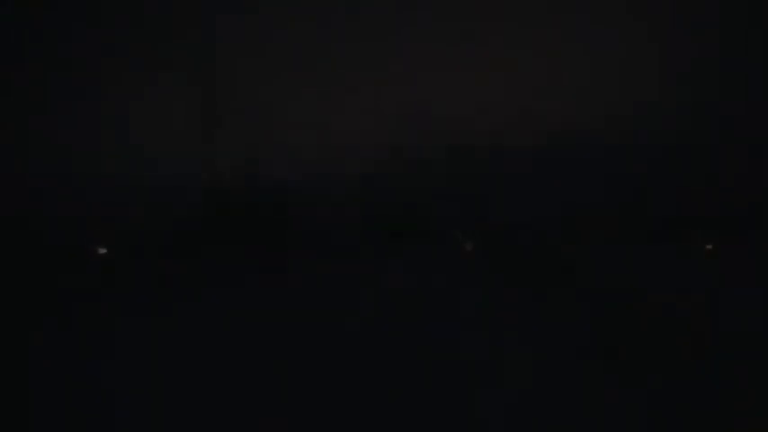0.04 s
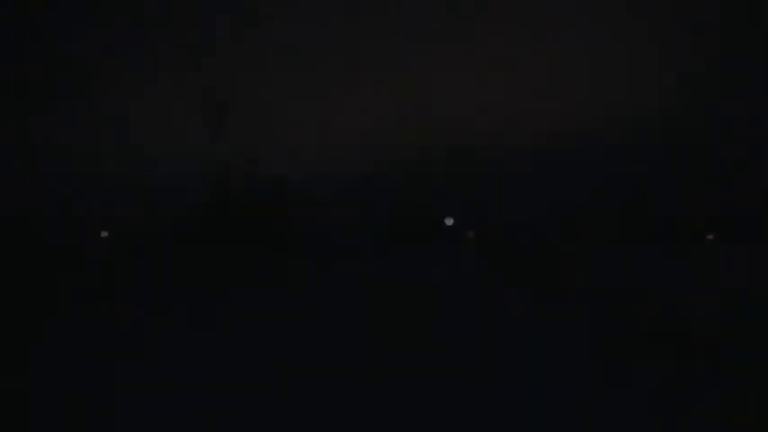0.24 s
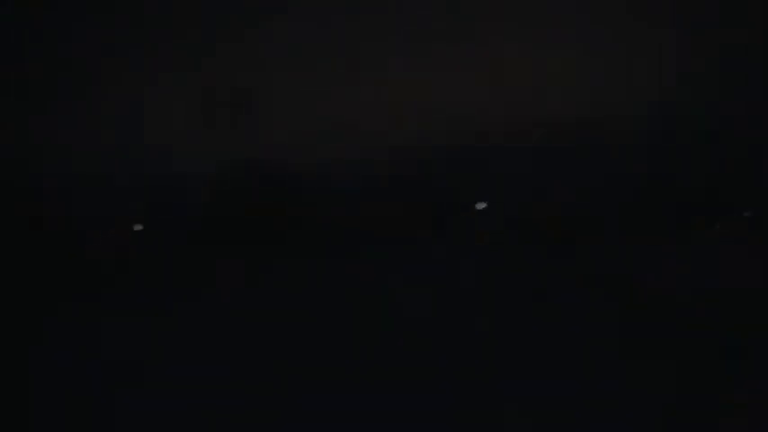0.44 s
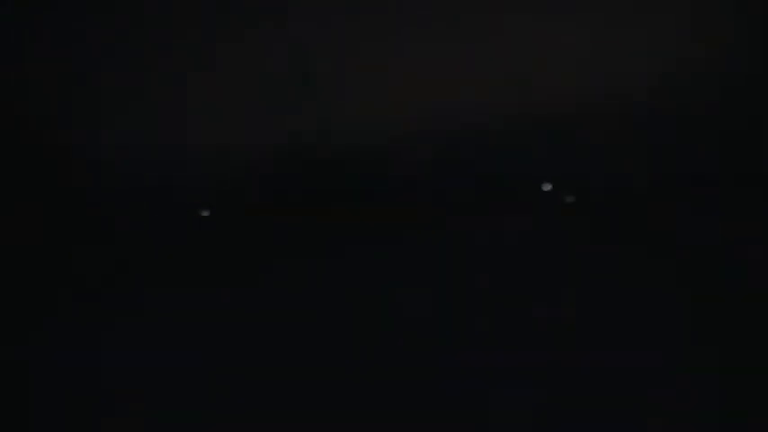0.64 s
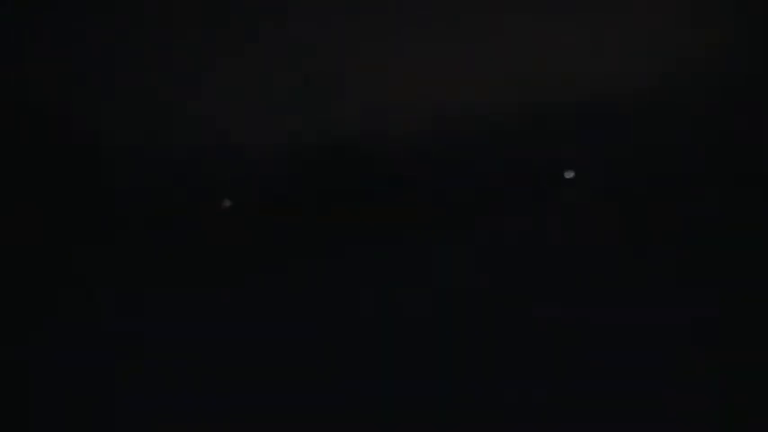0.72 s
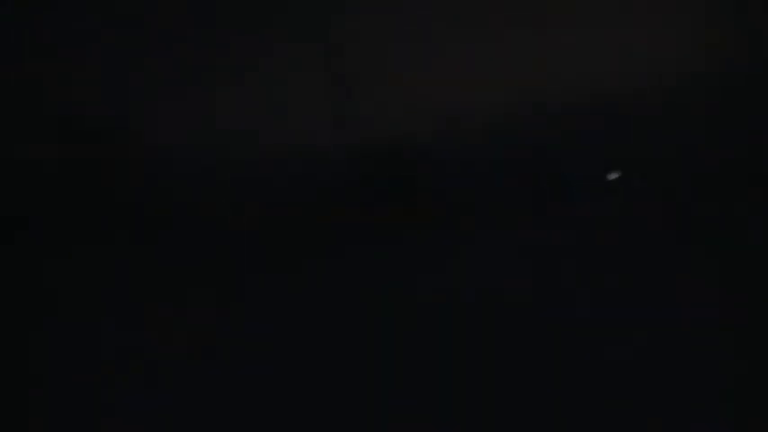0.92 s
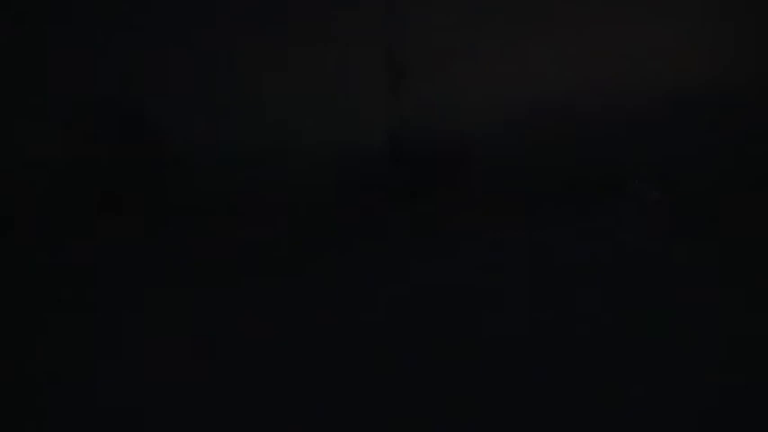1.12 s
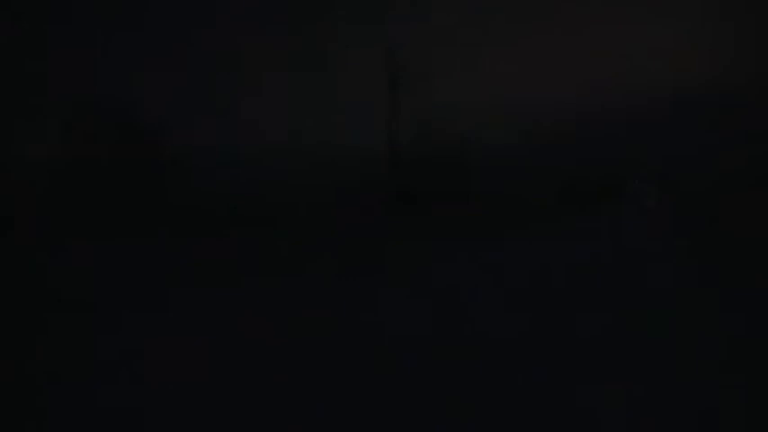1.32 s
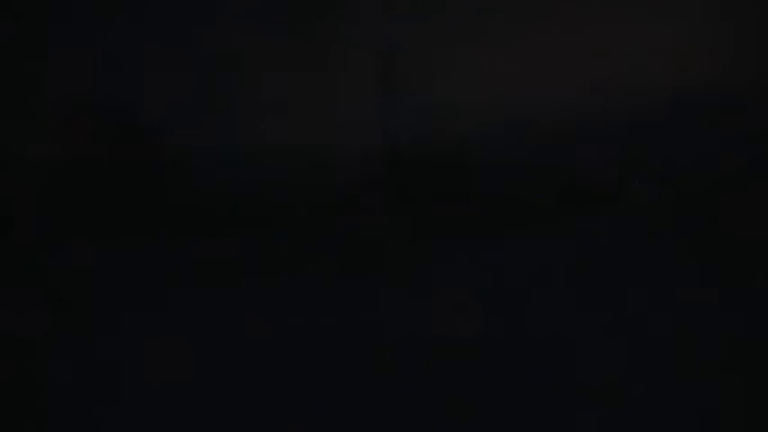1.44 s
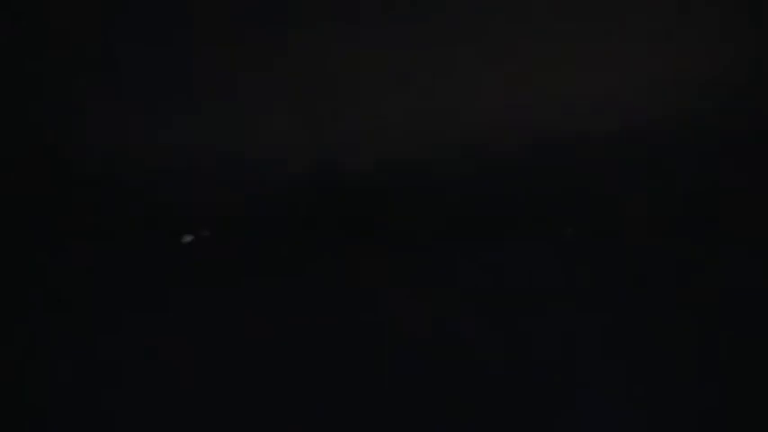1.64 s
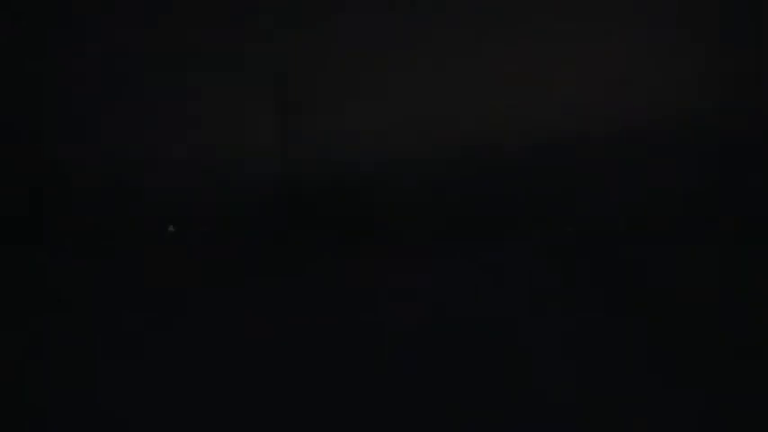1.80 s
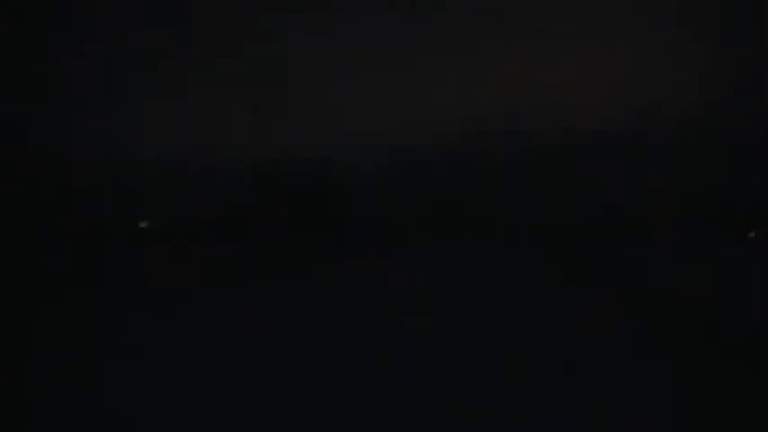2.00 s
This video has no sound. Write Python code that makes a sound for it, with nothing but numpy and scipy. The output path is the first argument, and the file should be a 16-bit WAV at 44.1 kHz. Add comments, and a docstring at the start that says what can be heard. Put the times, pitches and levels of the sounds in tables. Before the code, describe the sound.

Boots crunch and creak through crusty snow, close up, with faint distant traffic and low wind rumble

```python
"""Boots walk through cold snow at night, close below a hand-held camera's microphone.
Each boot breaks the crust in gritty crunches (showers of clicks) and ringing snaps, then packs the
snow in dull stick-slip creaks with thuds and damped knocks as pockets collapse.
Between steps it brushes through powder and rasps on ice, as filtered click trains.
Far traffic murmurs and moving air buffets the microphone, with one low knock: all coloured noise."""
import sys
import numpy as np
from scipy import signal
from scipy.fft import rfft, irfft, next_fast_len
from scipy.io import wavfile

SR = 44100
rng = np.random.default_rng(int(sys.argv[2]) if len(sys.argv) > 2 else 0)


def digitize_waveform(pressure):
    """Quantize a signal to 16-bit integers and store it at the path in sys.argv[1].

    Rows of a 2-D input are taken as channels; values are limited to [-1, 1].
    """
    field = np.atleast_2d(pressure).T
    bounded = np.clip(field, -1, 1)
    quanta = np.round(bounded * 32767).astype(np.int16)
    wavfile.write(sys.argv[1], SR, quanta)


N = 91022
T = np.arange(N) / SR  # time [s]

# crust crushed under a landing or rolling boot:
# (start [s], full [s], release [s], end [s], body level [dB], grit level [dB])
CRUNCHES = [(0, .005, .06, .21, -42, -48.5), (.539, .541, .547, .578, -34.5, -44),
            (1.35, 1.353, 1.367, 1.378, -28, -41), (1.366, 1.38, 1.402, 1.442, -30, -39)]
# short snaps of crust: (peak time [s], width [s], body level [dB], grit level [dB], ring pitch [Hz])
SNAPS = [(.008, 0.014, -30.5, -35.5, 765), (0.087, 0.01, -34.5, -41, 1112),
         (0.5441, 0.0026, -30, -38, 1890), (.621, 0.0038, -35, -46, 1875),
         (0.6626, 0.003, -33.5, -53, 1340), (.711, 0.0042, -33, -46, 1330), (.781, 0.0027, -40, -45.5, 993),
         (0.7967, .0014, -30, -49, 786), (1.109, 0.0018, -32.5, -53, 2220),
         (1.168, 0.00073, -52, -37.5, 2230), (1.1768, 0.002, -30.5, -39, 2120),
         (1.204, 0.0022, -40, -38, 4200), (1.466, 0.0055, -35, -41.5, 850),
         (1.5003, 0.0028, -30.5, -39, 1030), (1.545, 0.011, -34.5, -43, 640),
         (1.6545, 0.0043, -30.5, -39, 785), (1.732, 0.0039, -27.5, -35, 543),
         (1.7687, 0.0021, -38.5, -47, 3020), (1.829, 0.004, -26, -37, 1080)]
# snow packing under the sole:
# (start [s], full [s], release [s], end [s], body level [dB], grit level [dB])
CREAKS = [(0.599, 0.603, 0.64, .655, -43, -56), (0.655, .66, .67, .68, -33.5, -54),
          (0.676, .68, .688, .697, -36, -59), (0.706, 0.709, .72, .736, -32.5, -51),
          (0.728, 0.733, 0.786, 0.824, -37, -53), (0.788, 0.818, 0.873, 0.91, -29, -45.5),
          (0.873, .895, 0.925, 1.05, -32.5, -47.5), (1.343, 1.358, 1.398, 1.41, -30.5, -44),
          (1.398, 1.414, 1.445, 1.456, -32, -47), (1.449, 1.456, 1.46, 1.55, -34, -45),
          (1.927, 1.94, 2.03, 2.27, -42.5, -62.5)]
# colour of breaking crust: (frequency [Hz], level [dB])
CRUST_COLOUR = [(40, -33), (110, -13.5), (200, -11.5), (400, 0.5), (800, 0), (1100, -4.5), (1400, -2),
                (1650, -10.5), (2100, -8.5), (2600, -17.5), (4500, -24), (8000, -33.5), (16000, -72)]


def undb(db):
    """Decibels to gain."""
    return 10 ** (np.asarray(db) / 20)


def unit(x):
    """Scale to rms 1."""
    return x / np.sqrt(np.mean(x ** 2))


def colour(x, points):
    """Filter through (Hz, dB) points, with the minimum phase that keeps attacks sharp."""
    size = 2 * next_fast_len(N)
    hz, db = np.array(points, float).T
    f = np.maximum(np.arange(size // 2 + 1) * SR / size, 1)
    gain = undb(np.interp(np.log(f), np.log(hz), db))
    # folding the cepstrum onto positive time makes the filter causal
    cepstrum = irfft(np.log(gain))
    cepstrum[1:size // 2] *= 2
    cepstrum[size // 2 + 1:] = 0
    response = np.exp(rfft(cepstrum))
    return irfft(rfft(x, size) * response)[:N]


def noise(points):
    """Coloured noise of rms 1."""
    return unit(colour(rng.standard_normal(N), points))


def envelope(start, full, release, end):
    """Swell from start to full, hold, then die away from release to end."""
    up = np.clip((T - start) / max(full - start, 1 / SR), 0, 1)
    down = np.clip((end - T) / max(end - release, 1 / SR), 0, 1)
    return (up * down) ** 2


def snap(peak, width):
    """Exponential build-up to a peak and a slower exponential decay."""
    age = (T - peak) / width
    rise = 0.75  # build-up time as a share of the width
    return np.exp(-np.maximum(age, -age / rise))


def power_sum(forces):
    """Add forces that act independently, by power."""
    return np.sqrt(sum(force ** 2 for force in forces))


def clicks(per_s, jitter, spread_db, signed=True):
    """Train of clicks with uneven gaps and sizes, rms 1."""
    gap, size, sign = rng.standard_normal((N // 2, 3)).T
    gap = np.exp(jitter * gap - jitter ** 2 / 2)  # mean 1
    at = (np.cumsum(gap) * SR / per_s).astype(int)
    size = undb(spread_db * np.clip(size, -2, 2))
    if signed:
        size = size * np.sign(sign)
    return unit(np.bincount(at[at < N], size[at < N], N))


def excite(train, force, points):
    """Clicks scaled by a force ring a colour; the force sets the rms."""
    return colour(train * force, points) / np.std(colour(train, points))


def ring(train, hz, q):
    """Clicks through two equal resonances in series, rms 1."""
    b, a = signal.iirpeak(hz, q, fs=SR)
    once = signal.lfilter(b, a, train)
    return unit(signal.lfilter(b, a, once))


def stereo(mid, side):
    """Left and right from middle and difference."""
    return np.array([mid + side, mid - side])


def traffic():
    """Far roads blend into a steady murmur, spread across both channels."""
    # colour of the distant roads: (frequency [Hz], level [dB])
    road_colour = [(30, -18), (90, -11), (170, -14.5), (260, -6), (430, -2.5), (850, 0.5), (1280, -4),
                   (1650, -14.5), (2100, -20.5), (2500, -26), (3500, -31), (8500, -38.5), (12000, -42.5),
                   (16000, -58)]
    # left-right difference against the middle: (frequency [Hz], level [dB])
    road_width = [(100, 2), (350, -9), (700, -13.5), (1400, -9), (3000, 0), (10000, 0)]
    side = colour(noise(road_colour), road_width)
    return undb(-44) * stereo(noise(road_colour), side)


def wind():
    """Low air buffets and one low knock, mostly opposite in the two channels."""
    # colour of the steady air: (frequency [Hz], level [dB])
    air_colour = [(10, -1), (30, -4.5), (65, 5.5), (130, -4.5), (300, -22), (800, -39.5), (3000, -60.5)]
    # gusts at the microphone, and a low knock at 1.8 s:
    # (peak time [s], half width [s], level [dB], upper edge [Hz])
    swells = [(.018, .012, -37, 60), (.38, 0.096, -42, 69.5), (0.506, 0.012, -32, 72),
              (1.142, 0.018, -32.5, 105), (1.33, 0.027, -44, 78.6), (1.802, 0.013, -24.5, 150)]
    air_db, common_db = -51, -10  # common: middle against difference

    def buffets():
        """Steady air with a bell-shaped swell of low noise for each gust or knock."""
        out = undb(air_db) * noise(air_colour)
        for peak, width, db, hz in swells:
            swell = np.exp(-((T - peak) / width) ** 2 / 2)
            swell_colour = [(hz / 6, -18), (hz / 2, -1), (hz, 0),
                            (2 * hz, -17), (8 * hz, -48), (40 * hz, -90)]
            out += undb(db) * swell * noise(swell_colour)
        return out

    return stereo(undb(common_db) * buffets(), buffets())


def crust():
    """The frozen surface breaks in short showers of cracks."""
    forces = [undb(db) * envelope(*shape) for *shape, db, _ in CRUNCHES]
    forces += [undb(db) * snap(peak, width) for peak, width, db, *_ in SNAPS]
    cracks = clicks(per_s=1900, jitter=.6, spread_db=4.5)
    return excite(cracks, power_sum(forces), CRUST_COLOUR)


def grit():
    """Fine ice crystals rub wherever the boot packs, crunches or snaps the snow."""
    # colour of rubbing ice crystals: (frequency [Hz], level [dB])
    crystal_colour = [(200, -32), (1200, 0), (2500, -2), (3600, -1), (5200, 1), (6800, -4), (8800, -1),
                      (11000, -8), (13000, -16), (16000, -29.5)]
    forces = [undb(db) * envelope(*shape) for *shape, _, db in [*CREAKS, *CRUNCHES]]
    forces += [undb(db) * snap(peak, width) for peak, width, _, db, _ in SNAPS]
    crystals = clicks(per_s=6000, jitter=1.0, spread_db=1.5)
    return excite(crystals, power_sum(forces), crystal_colour)


def plates():
    """Each snapping piece of crust rings briefly at its own pitch."""
    ring_db = -2  # against the snap's body
    cracks = clicks(per_s=2500, jitter=.5, spread_db=2)
    out = np.zeros(N)
    for peak, width, db, _, hz in SNAPS:
        out += undb(db + ring_db) * snap(peak, width) * ring(cracks, hz, q=5.1)
    return out


def drag():
    """The swinging boot brushes through loose snow: a hollow swish and a fine hiss of powder."""
    # boot dragging through powder:
    # (start [s], full [s], release [s], end [s], swish level [dB], powder hiss level [dB])
    drags = [(0.298, 0.426, 0.55, 0.55, -80, -67), (0.54, 0.557, 0.62, 1.02, -52.5, -59),
             (0.9, 1.028, 1.033, 1.077, -42.5, -47.5), (1.048, 1.054, 1.104, 1.172, -40.5, -47),
             (1.109, 1.11, 1.103, 1.2, -42.5, -41), (1.143, 1.137, 1.15, 1.253, -46.5, -52),
             (1.55, 1.632, 1.743, 1.78, -52, -62.5), (1.719, 1.773, 1.85, 1.9, -45, -60.5),
             (1.886, 1.949, 2.15, 2.204, -43.5, -62.5)]
    # colour of the hollow swish: (frequency [Hz], level [dB])
    swish_colour = [(80, -27.5), (400, 0.5), (800, 5), (1300, -2), (1650, 0), (2150, -2), (2900, -7),
                    (3600, -10.5), (4600, -13), (5600, -17), (7000, -18), (9300, -19), (12000, -34),
                    (16000, -48)]
    # colour of the fine powder: (frequency [Hz], level [dB])
    powder_colour = [(300, -21), (1500, 0.5), (3000, -11), (3900, 0), (4700, 0.5), (5500, -4.5),
                     (7000, -4.5), (8600, -1), (10000, -3.5), (12000, -9), (16000, -29)]
    swish_force = sum(undb(db) * envelope(*shape) for *shape, db, _ in drags)
    hiss_force = power_sum([undb(db) * envelope(*shape) for *shape, _, db in drags])
    swish = excite(clicks(per_s=4000, jitter=.9, spread_db=6.0), swish_force, swish_colour)
    hiss = excite(clicks(per_s=5600, jitter=0.83, spread_db=8.5), hiss_force, powder_colour)
    return swish + hiss


def thuds():
    """The ground takes the weight of the boot with a soft, low bump."""
    # dull thuds underfoot: (peak time [s], width [s], level [dB])
    bumps = [(0.549, 0.0116, -35.5), (.615, 0.019, -39), (0.667, 0.01, -36), (0.684, 0.0049, -32.5),
             (0.713, 0.005, -31), (.77, 0.015, -43.5), (1.059, 0.027, -45.5), (1.203, 0.0039, -36),
             (1.363, 0.0095, -33.5), (1.656, 0.009, -38), (1.734, 0.02, -36), (1.83, 0.016, -35)]
    # colour of the ground: (frequency [Hz], level [dB])
    ground_colour = [(30, -26), (80, -17), (140, -5), (220, -1), (310, -1), (480, -2.5), (900, -38),
                     (3000, -70)]
    force = sum(undb(db) * snap(*shape) for *shape, db in bumps)
    return excite(clicks(per_s=1500, jitter=0.501, spread_db=1.5), force, ground_colour)


def packing():
    """Snow gives way under the sole in a run of small slips, with crumbs between them."""
    # colour of packed snow: (frequency [Hz], level [dB])
    packed_colour = [(40, -36), (130, -8.5), (280, -9), (430, -2), (720, 1), (1000, -3), (1350, -8),
                     (1700, -12.5), (2200, -15.5), (3100, -24.5), (5000, -40.5), (9000, -41), (16000, -68)]
    slips = clicks(per_s=240, jitter=.4, spread_db=1.5, signed=False)
    crumbs = undb(-0.5) * clicks(per_s=2500, jitter=0.98, spread_db=4)
    load = sum(undb(db) * envelope(*shape) for *shape, db, _ in CREAKS)
    return excite(slips + crumbs, load, packed_colour)


def collapses():
    """Each larger pocket gives a sharp crack and one heavily damped knock."""
    # single pockets of snow collapsing: (start [s], pitch [Hz], level [dB])
    pockets = [(0.6118, 740, -24.5), (.637, 1870, -26.5), (0.681, 640, -21.5), (.6872, 970, -21),
               (0.6918, 422, -24), (.715, 810, -21), (.796, 707, -23), (0.8185, 715, -14.5),
               (.8247, 780, -22), (0.8301, 865, -17), (0.8374, 945, -19.5), (0.8648, 750, -18),
               (0.8734, 990, -19.5), (0.8829, 544, -19.5), (0.9049, 500, -24), (1.357, 447.6, -13.5),
               (1.3616, 390, -18.5), (1.3667, 740, -14), (1.393, 466, -22), (1.4251, 725, -22.5),
               (1.4307, 635, -23.5), (1.4383, 632, -17.5), (1.4577, 662, -21), (1.6548, 775, -19),
               (1.7298, 467, -28.5), (1.8276, 800, -19.5), (1.942, 729, -24)]
    swell_cycles = 0.43  # cycles until the knock's envelope peaks
    crack_db = -10  # crack against its knock
    knocks, cracks = np.zeros(N), np.zeros(N)
    for start, hz, db in pockets:
        cycles = np.maximum(T - start, 0) * hz
        age = cycles / swell_cycles
        knocks -= undb(db) * age * np.exp(1 - age) * np.sin(2 * np.pi * cycles)
        cracks[int(start * SR)] -= undb(db)
    one_crack = colour(signal.unit_impulse(N), CRUST_COLOUR)
    cracks = colour(cracks, CRUST_COLOUR) / np.abs(one_crack).max()
    return knocks + undb(crack_db) * cracks


def scrapes():
    """The edge of the boot catches on icy snow and rasps in a narrow band."""
    # boot edge on ice: (start [s], full [s], release [s], end [s], pitch [Hz], level [dB])
    rasps = [(.985, 1.025, 1.036, 1.08, 4560, -47), (1.04, 1.053, 1.133, 1.23, 2090, -47)]
    catches = clicks(per_s=2200, jitter=0.91, spread_db=6)
    out = np.zeros(N)
    for *shape, hz, db in rasps:
        out += undb(db) * envelope(*shape) * ring(catches, hz, q=4.5)
    return out


def place(steps):
    """The steps lean mostly left; random modulation makes their image flicker, widest in the treble."""
    # how fast the stereo image flickers: (frequency [Hz], level [dB])
    flutter = [(20, 2.5), (120, -0.5), (300, -26), (1500, -48)]
    # left-right difference of the steps: (frequency [Hz], level [dB])
    step_width = [(100, -45), (450, -36), (1300, -18), (3000, -22), (6000, -15), (9000, -7.5), (15000, -15)]
    # balance at the microphone: (frequency [Hz], left minus right [dB])
    balance = [(100, 2.5), (450, -0.5), (800, 1), (1250, 3.5), (2200, -0.72), (5000, 1.22), (9000, .6),
               (13000, 4)]
    side = colour(steps * noise(flutter), step_width)
    left, right = stereo(steps, side)
    # each ear takes half of the balance
    left = colour(left, [(hz, db / 2) for hz, db in balance])
    right = colour(right, [(hz, -db / 2) for hz, db in balance])
    return np.array([left, right])


def scene():
    """Footsteps close to the microphone, over the night air and far roads."""
    breaking = crust() + grit() + plates()
    sole = thuds() + packing() + collapses()
    swing = drag() + scrapes()
    return place(breaking + sole + swing) + wind() + traffic()


def record(dry):
    """The camera adds a faint steady whine and cuts the top with a steep low-pass."""
    whine_hz, whine_db, top_hz = 11420, -86, 15800
    whine = undb(whine_db) * np.sin(2 * np.pi * whine_hz * T)
    low_pass = signal.ellip(12, .1, 90, top_hz, fs=SR, output="sos")  # ripple, stop depth [dB]
    return signal.sosfilt(low_pass, dry + whine)


dry = scene()
out = record(dry)
digitize_waveform(out)
```